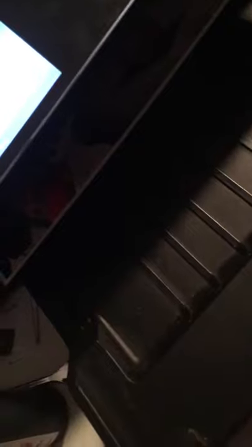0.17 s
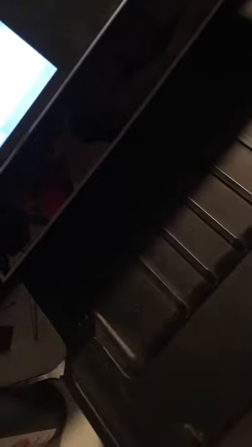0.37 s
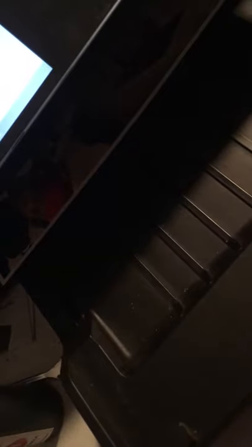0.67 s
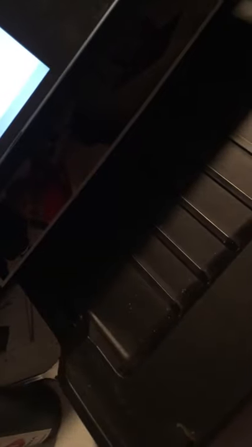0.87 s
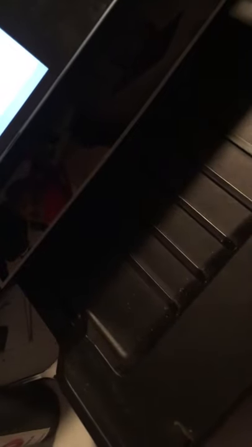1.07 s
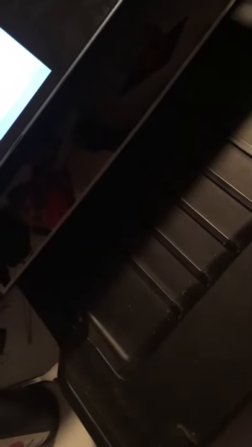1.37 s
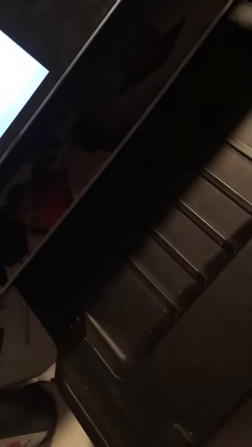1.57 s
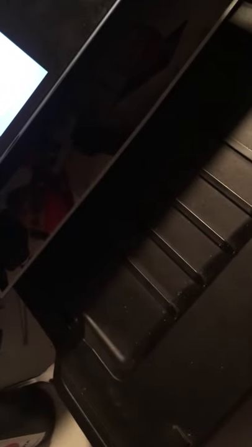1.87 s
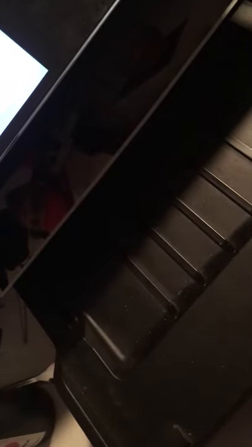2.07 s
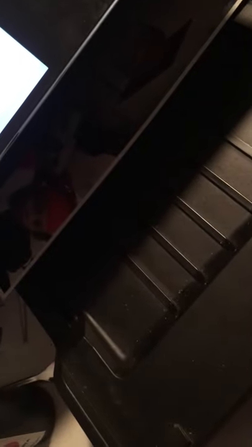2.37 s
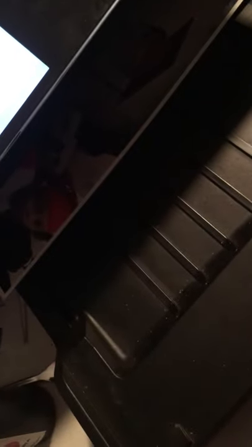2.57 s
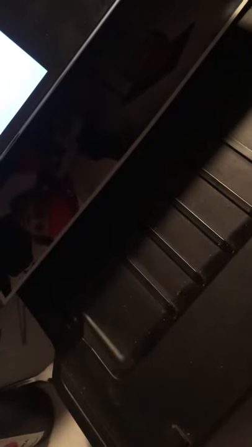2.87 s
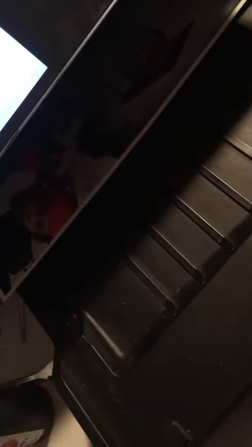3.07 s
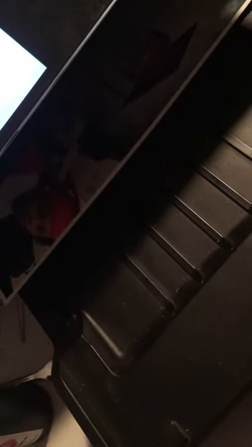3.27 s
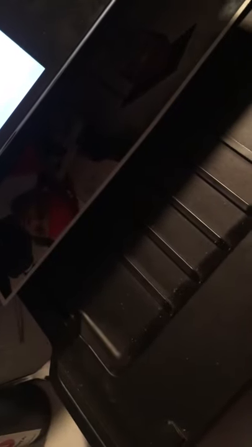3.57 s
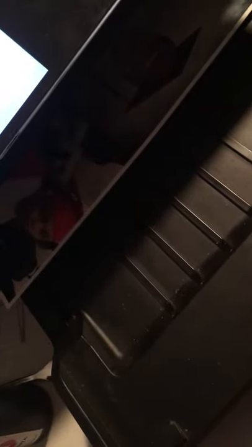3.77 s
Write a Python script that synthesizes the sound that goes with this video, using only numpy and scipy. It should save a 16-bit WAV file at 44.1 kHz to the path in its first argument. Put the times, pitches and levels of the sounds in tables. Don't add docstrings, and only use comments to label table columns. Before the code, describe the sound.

An inkjet printer runs close to one microphone in a quiet room, cutting in abruptly at 0.07 s. Its carriage makes short whining, hissing strokes with fine high squeaks and a slight frame groan. Around 0.47, 0.92, 1.37, 1.82, 2.28, 2.73, 3.18 and 3.63 s it reverses with gear ticks, plastic knocks, a paper-feed hiss and low desk booms. Outward strokes whine more strongly; faint fan hum continues throughout.

```python
import sys
import numpy as np
from scipy import signal
from scipy.fft import rfft, irfft
from scipy.io import wavfile
from scipy.ndimage import uniform_filter1d

SR = 44100
rng = np.random.default_rng(int(sys.argv[2]) if len(sys.argv) > 2 else 0)


def master_out(mix):
    frames = np.transpose(np.atleast_2d(mix))
    ceiling = np.clip(frames, -1, 1)
    pcm = np.round(ceiling * 32767).astype(np.int16)
    wavfile.write(sys.argv[1], SR, pcm)


def invert_db(x):
    u = np.asarray(x, float) / 20
    return 10 ** u


N = 172872


def rms_one(x):
    return x / np.sqrt(np.mean(x ** 2) + 1e-20)


def filtered(x, order, edge_hz, kind="low"):
    return signal.sosfilt(signal.butter(order, edge_hz, kind, fs=SR, output="sos"), x)


def colour_db(points, peaks, hz):
    point_hz, point_db = np.transpose(points)
    level_db = np.interp(np.log(hz), np.log(point_hz), point_db, left=-60, right=-60)
    for mid_hz, width_hz, peak_db in peaks:
        level_db = level_db + peak_db / (1 + ((hz - mid_hz) / width_hz * 2) ** 2)
    return level_db


def drift(rate_hz):
    r = np.exp(-80 * np.pi * rate_hz / SR)
    slow = signal.lfilter([1], [1, -2 * r, r * r], rng.standard_normal(N // 40 + 2002))
    slow = rms_one(slow[2000:])
    return np.interp(np.arange(N) / 40, np.arange(len(slow)), slow)


def noise(spectrum, peaks, patchy_db, rate_hz, per_octave=2):
    hz = np.fft.rfftfreq(N, 1 / SR) + 1
    shaped = rfft(rng.standard_normal(N)) * invert_db(colour_db(spectrum, peaks, hz))
    low_hz, high_hz = spectrum[0][0], spectrum[-1][0]
    place = per_octave * np.log2(hz / low_hz)
    together = drift(13.6)
    out = np.zeros(N)
    for k in range(int(per_octave * np.log2(high_hz / low_hz)) + 2):
        band = irfft(shaped * np.clip(1 - abs(place - k), 0, 1), N)
        out += band * invert_db(patchy_db * (0.18 * together + drift(rate_hz)))
    return rms_one(out)


def ring(drive, hz, t60_s):
    r, w = invert_db(-60 / (t60_s * SR)), 2 * np.pi * hz / SR
    return signal.lfilter([0, np.sin(w)], [1, -2 * r * np.cos(w), r * r], drive + 1e-18)


def struck(contacts, modes, gain_db, soft_hz, scatter_db, chatter_s, lead_s, loose):
    start_s, level_db = np.transpose(contacts)
    bounce = np.arange(3)
    uneven = 1 + loose * rng.uniform(-1, 1, (len(start_s), 3))
    hit_s = (start_s[:, None] - lead_s + chatter_s * bounce * uneven).ravel()
    hit_db = (level_db[:, None] - 2.5 * bounce).ravel()
    at = (hit_s * SR).astype(int)
    out = 0
    for hz, mode_db, t60_s in modes:
        side = np.where(rng.random(len(at)) < loose, -1, 1)
        clicks = np.zeros(N)
        clicks[at] = side * invert_db(gain_db + hit_db + mode_db + scatter_db * rng.standard_normal(len(at)))
        out = out + ring(clicks, hz, t60_s)
    return filtered(out, 2, soft_hz)


def since_turn():
    turns = [
        .012,
        0.468,
        .918,
        1.371,
        1.821,
        2.276,
        2.726,
        3.179,
        3.631,
    ]
    t = np.arange(N) / SR
    last = np.clip(np.searchsorted(turns, t) - 1, 0, None)
    return t - np.array(turns)[last], last % 2


def carriage_speed(after_s):
    # after_turn_s, share_of_full_speed
    stroke = [(.075, 0.052), (.11, 0.52), (.13, 0.74), (.15, .94), (.168, .985), (.2, 1.01), (.27, 1.003),
              (.39, 1.001), (.42, 0.93), (.452, 0.042)]
    return np.clip(uniform_filter1d(np.interp(after_s, *np.transpose(stroke)), size=300), 0, None)


def fan_and_room():
    # pitch_hz, level_db
    hum = [(97, -71), (194, -65), (291.5, -70), (388, -76), (587, -82.5)]
    # freq_hz, density_db_per_hz
    air = [(180, -18), (300, -5.5), (469, -8.5), (1010, -6.5), (1230, -11.5), (1990, -14.5), (3610, -21),
           (7010, -28.5), (15800, -33)]
    # freq_hz, density_db_per_hz
    rumble = [(25, -35), (42, -4), (108, -2), (242, -11.5), (263, -14.5), (295, -14.5), (327, -15.5),
              (390, -21.5), (500, -43), (650, -58), (1100, -120)]
    t = np.arange(N) / SR
    out = invert_db(-63) * noise(air, [], patchy_db=2.0, rate_hz=24.5)
    out += invert_db(-53.5) * noise(rumble, [], patchy_db=1.5, rate_hz=11.0)
    for hz, level_db in hum:
        phase = 2 * np.pi * hz * t + 0.72 * drift(2.86)
        out += invert_db(level_db + 3.7 * drift(2.65)) * np.sqrt(2) * np.sin(phase)
    return out


def paper_feed(after_s, from_far):
    # freq_hz, density_db_per_hz
    hiss = [(260, -15), (450, -4.5), (1180, -0.5), (1480, -19), (2350, -13.5), (3510, -17.5), (11400, -18),
            (15800, -22.5)]
    feed_s, fall_s = 0.04, 0.016
    rollers = invert_db(-53) * np.clip(after_s / 0.013, 0, 1) * np.exp(-np.clip(after_s - feed_s, 0, None) / fall_s)
    snap = invert_db(-53.5) * np.exp(-after_s / 0.0019)
    from_flick_s = after_s - 0.382
    flick = invert_db(-54) * (1 - from_far) * np.clip(from_flick_s / 0.0034, 0, 1) * np.exp(-np.abs(from_flick_s) / 0.014)
    bright = rms_one(filtered(rng.standard_normal(N), 2, [2500, 12000], "band"))
    return rollers * noise(hiss, [], patchy_db=3.5, rate_hz=41.0) + (flick + snap) * bright


def desk_booms():
    # start_s, level_db
    jolts = [(0.068, -43), (0.094, -38), (0.216, -47), (0.514, -35), (0.57, -37), (0.6, -45), (0.657, -42),
             (0.972, -40.5), (0.997, -56), (1.079, -47), (1.111, -44), (1.417, -36), (1.451, -36),
             (1.498, -41), (1.561, -48), (1.875, -41.5), (1.9, -44.5), (1.968, -44.5), (2.023, -47),
             (2.322, -35), (2.376, -40), (2.418, -40.5), (2.454, -52), (2.778, -41), (2.804, -43),
             (2.916, -47), (3.226, -34.5), (3.281, -41), (3.308, -47), (3.371, -48), (3.682, -43),
             (3.708, -42)]
    # pitch_hz, level_db, t60_s
    modes = [(59, -3.5, 0.28), (98.7, -5, 0.061), (111.6, 3.5, 0.22), (135.2, 2.5, 0.21), (198, -5.5, 0.2)]
    return struck(jolts, modes, gain_db=-11, soft_hz=454, scatter_db=1.9,
                  chatter_s=0.00853, lead_s=0.00607, loose=.06)


def case_knocks():
    # start_s, level_db
    knocks = [(0.07, -54), (0.085, -49), (0.129, -66), (0.158, -70), (0.469, -49), (0.481, -43.5),
              (0.491, -42), (0.506, -49.5), (0.526, -45.5), (0.537, -46), (0.546, -50.5), (0.833, -48.5),
              (0.932, -48), (0.943, -47), (0.963, -51), (0.981, -50.5), (0.993, -51), (1.003, -59),
              (1.37, -55), (1.387, -41.5), (1.407, -48), (1.42, -48), (1.441, -46), (1.735, -49.5),
              (1.839, -43.5), (1.849, -51), (1.864, -47), (1.879, -45), (1.889, -51), (2.288, -41.5),
              (2.299, -47), (2.31, -46), (2.322, -45), (2.343, -42.5), (2.366, -54), (2.64, -50),
              (2.739, -43), (2.749, -53), (2.767, -50), (2.777, -61), (2.787, -48), (2.799, -49),
              (3.174, -53), (3.19, -47.5), (3.2, -42.5), (3.228, -45.5), (3.246, -48), (3.255, -58),
              (3.268, -52), (3.542, -45.5), (3.643, -41), (3.655, -48), (3.671, -48.5), (3.682, -54),
              (3.705, -47)]
    # pitch_hz, level_db, t60_s
    modes = [(235.5, -8, 0.17), (287.4, -3, 0.075), (388.5, -2.5, 0.059), (519, -13.5, 0.047),
             (640, -6, 0.061), (768, -9, 0.042), (863, -3.5, 0.053), (948, -13, 0.071),
             (1186, -20.5, 0.059), (1322, -12.5, 0.032)]
    return struck(knocks, modes, gain_db=-4.5, soft_hz=2500, scatter_db=3.5,
                  chatter_s=0.00302, lead_s=0.00197, loose=.45)


def gear_ticks():
    # start_s, level_db
    ticks = [(0.081, -53), (0.47, -57), (0.477, -48), (0.483, -49), (0.492, -56), (0.515, -53),
             (0.542, -55), (0.61, -57), (0.918, -41), (0.928, -44), (0.937, -47), (0.949, -55),
             (0.971, -46.5), (0.988, -55), (1.373, -47), (1.38, -59), (1.388, -70), (1.41, -61),
             (1.42, -58), (1.429, -56), (1.438, -56), (1.444, -56), (1.511, -52), (1.821, -49.5),
             (1.828, -47), (1.836, -55), (1.852, -56), (1.863, -53), (1.878, -49), (2.277, -48.5),
             (2.285, -47), (2.296, -58), (2.321, -56), (2.349, -54.5), (2.424, -55), (2.727, -45),
             (2.736, -39.5), (2.746, -54), (2.753, -49), (2.775, -50), (2.795, -52), (3.18, -47.5),
             (3.19, -45.5), (3.205, -54), (3.221, -53), (3.249, -51), (3.631, -47.5), (3.637, -54),
             (3.644, -53), (3.658, -39.5), (3.672, -58), (3.681, -55), (3.703, -54.5)]
    # pitch_hz, level_db, t60_s
    modes = [(1636, -6.5, 0.032), (2004, -8, 0.023), (2170, -17.5, 0.012), (2294, -2.5, 0.046),
             (2398, -0.5, 0.03), (2870, -12, 0.018), (3225, -12.5, 0.016)]
    return struck(ticks, modes, gain_db=-4.5, soft_hz=6050, scatter_db=1.3,
                  chatter_s=0.001297, lead_s=0.001207, loose=.45)


def belt(speed, after_s, from_far):
    # after_turn_s, level_db
    load = [
        [(.09, -72), (.14, -71), (.2, -79), (.25, -66), (.33, -60), (.38, -60), (.42, -79), (.45, -70)],
        [(.09, -69), (.145, -76), (.19, -73.5), (.22, -76), (.27, -65), (.33, -75), (.41, -71.5), (.45, -81)],
    ]
    # multiple, outward_db, return_db
    overtones = [(2, -81, -82), (3, -83, -85), (4, -79.5, -85), (10, -75.5, -80), (13, -86, -90)]
    # pitch_hz, width_hz, gain_db
    peaks = [(1915, 99, 19.5), (3680, 480, 10), (8550, 700, 14)]
    flat = [(1, 0), (SR, 0)]
    teeth_hz = 1005 * speed * (1 + 0.00397 * drift(17.7))
    phase = 2 * np.pi * np.cumsum(teeth_hz) / SR
    outward_db, return_db = [np.interp(after_s, *np.transpose(points)) for points in load]
    load_db = np.where(from_far, return_db, outward_db)
    out = invert_db(load_db + 3.1 * drift(40)) * speed ** 3.1 * np.sin(phase)
    release = np.clip((.43 - after_s) / 0.025, 0, 1)
    for multiple, out_db, back_db in overtones:
        level_db = np.where(from_far, back_db, out_db) + colour_db(flat, peaks, multiple * teeth_hz + 1)
        out += invert_db(level_db + 2.9 * drift(50)) * speed * release * np.sin(multiple * phase)
    return out * np.sqrt(2)


def sled_hiss(speed):
    # freq_hz, density_db_per_hz
    slide = [(260, -66), (450, -25), (816, -16.5), (1020, -5.5), (1820, -20), (1990, -21), (2730, -18),
             (2940, -26), (15800, -18)]
    # pitch_hz, width_hz, gain_db
    peaks = [(1044, 77, 4), (1556, 89, 8), (3305, 150, 13), (6920, 900, 8.5), (11430, 600, 7),
             (13200, 930, 6)]
    return invert_db(-60.5) * speed ** 1.13 * noise(slide, peaks, patchy_db=3.0, rate_hz=21.4, per_octave=3)


def bearing_squeaks(speed):
    per_s, t60_s, low_hz, high_hz = 2600, .024, 4800, 15300
    catches = rng.random(N) < per_s * speed / SR
    catches = catches * invert_db(2.2 * np.minimum(rng.exponential(1, N), 3))
    dealt = rng.integers(0, 30, N)
    pitches_hz = np.geomspace(low_hz, high_hz, 30) * rng.uniform(0.95, 1.02, 30)
    out = np.zeros(N)
    for k, hz in enumerate(pitches_hz):
        out += ring(ring(catches * (dealt == k), hz, t60_s), hz, t60_s)
    return invert_db(-70) * rms_one(out)


def frame_groan(after_s, from_far):
    # pitch_hz, t60_s, pull_db, brake_db
    modes = [
        (874, 0.36, -62, -66),
        (912, 0.099, -55, -56),
    ]
    from_pull_s, from_brake_s = after_s - 0.1367, after_s - .415
    pull = np.clip(from_pull_s / 0.0075, 0, 1) * np.exp(-(from_pull_s / 0.058) ** 2)
    brake = np.exp(-(from_brake_s / 0.014) ** 2)
    out = 0
    for end, (hz, t60_s, pull_db, brake_db) in enumerate(modes):
        groan = rms_one(ring(rng.standard_normal(N), hz, t60_s))
        out = out + (from_far == end) * (invert_db(pull_db) * pull + invert_db(brake_db) * brake) * groan
    return out


def scene():
    after_s, from_far = since_turn()
    speed = carriage_speed(after_s)
    hits = filtered(desk_booms() + case_knocks() + gear_ticks(), 2, 55, "high")
    feed = fan_and_room() + paper_feed(after_s, from_far) + hits
    carriage = belt(speed, after_s, from_far) + sled_hiss(speed) + bearing_squeaks(speed) + frame_groan(after_s, from_far)
    mono = feed + carriage
    return np.stack([mono, mono])


def band_limit(x):
    return signal.sosfilt(signal.butter(12, 16120, fs=SR, output="sos"), x)


def record(dry):
    gate = np.clip((np.arange(N) / SR - 0.07) / 0.00046, 0, 1)
    low_pass = signal.cheby2(20, 50, 16000, fs=SR, output="sos")
    mix = signal.sosfilt(low_pass, dry * gate)
    return band_limit(mix)


dry = scene()
out = record(dry)
master_out(out)
```